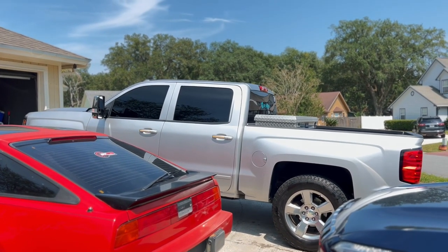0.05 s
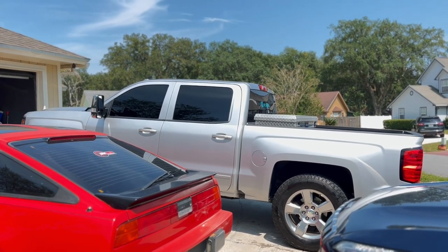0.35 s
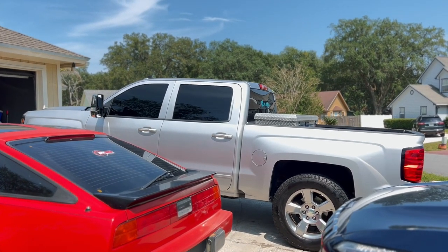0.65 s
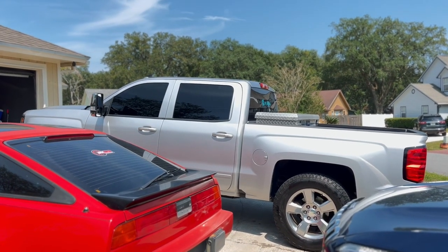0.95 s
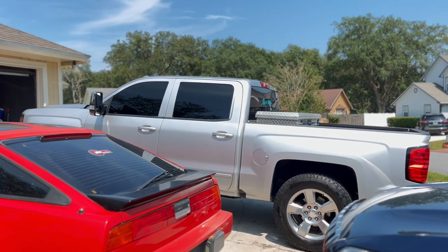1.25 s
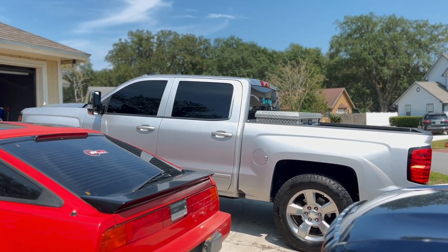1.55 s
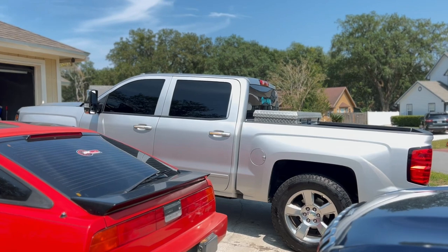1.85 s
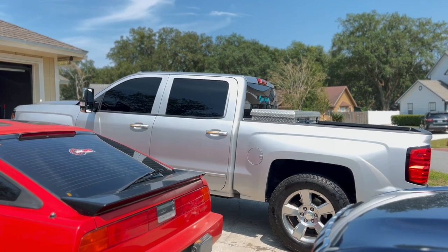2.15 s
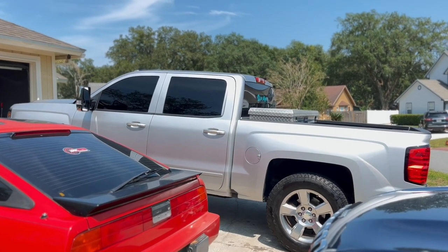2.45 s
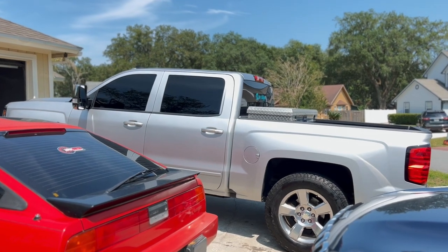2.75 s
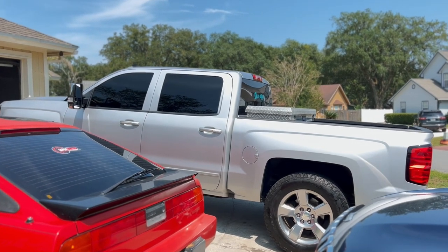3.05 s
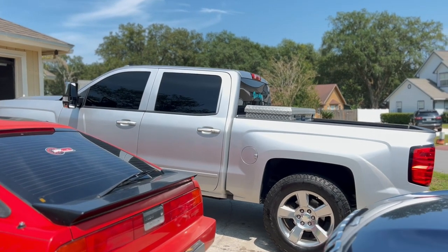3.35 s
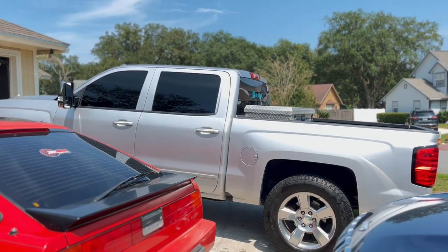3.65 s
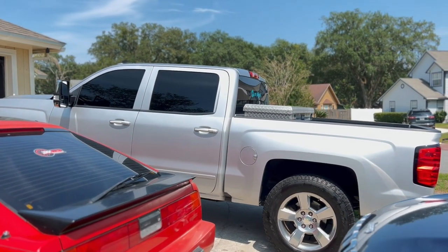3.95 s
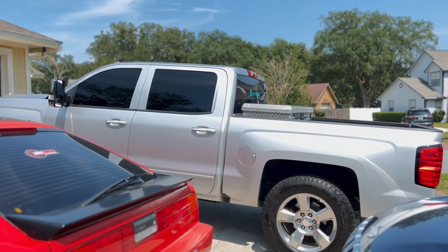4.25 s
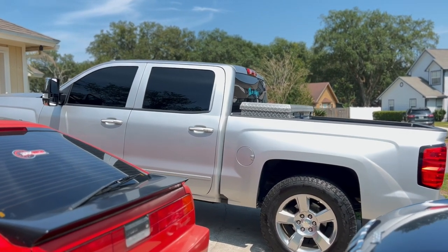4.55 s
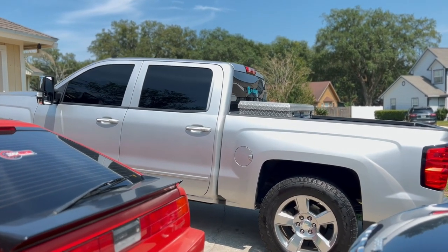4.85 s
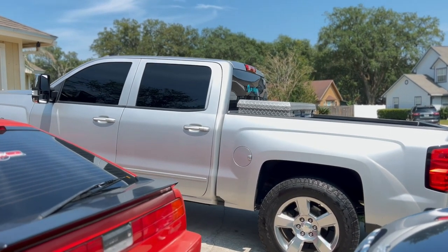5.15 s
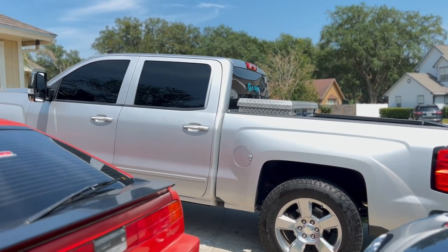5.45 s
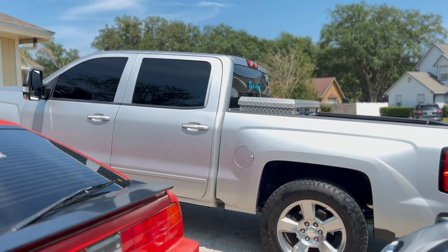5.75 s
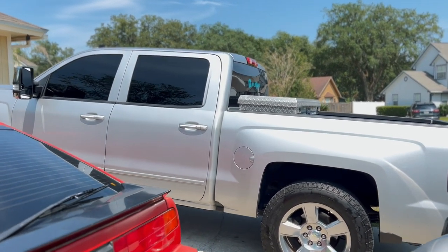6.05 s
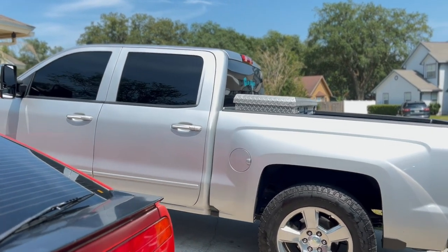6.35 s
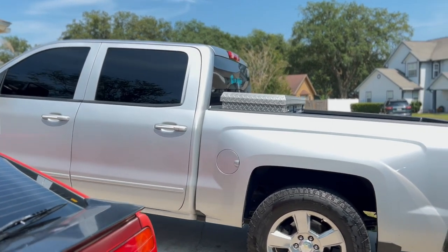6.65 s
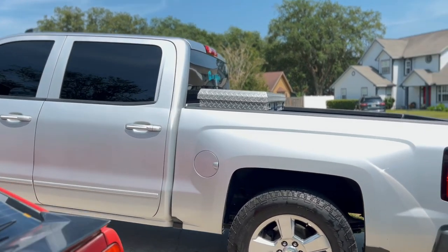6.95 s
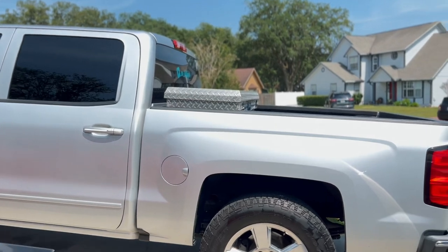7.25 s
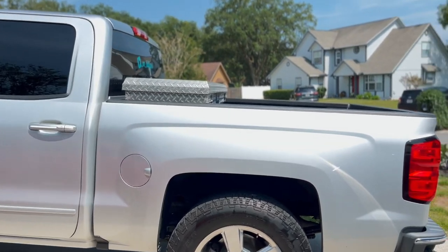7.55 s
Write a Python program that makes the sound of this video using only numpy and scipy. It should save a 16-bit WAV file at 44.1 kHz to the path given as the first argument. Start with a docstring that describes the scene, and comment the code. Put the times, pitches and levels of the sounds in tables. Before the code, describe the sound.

A low, quiet outdoor rumble opens the scene, with a few soft thumps and tiny scuffs near the microphone in the first second. At about 1.9 seconds a pickup's fuel pump starts a faint hum with a thin high whine. At 2.5 seconds the starter clacks in and cranks the cold engine in quickening, rattling pulses, with one small metallic chink. At about 3.3 seconds the V8 catches with a deep, loud whump, a cluster of sharp pops and two brief scrapes as the starter lets go. The engine races until about 4 seconds, then gradually sinks to a loud, throbbing fast idle, uneven and dotted with hollow exhaust pops. Walls and parked cars add a short echo. From 6 seconds the exhaust grows a little louder and raspier as the microphone approaches, still running at the end, around 7.6 seconds.

```python
"""A V8 pickup starts cold on a driveway. Its fuel pump hums, the starter clacks in and turns the
engine over, then the engine catches, races briefly and sinks to a fast idle. Each of the eight
cylinders pushes its own unequal puff of gas down the open exhaust pipe, so the sound throbs; fuel
that burns late adds sharp pops. House walls and parked cars give a short echo. A low outdoor rumble
lies underneath, with a few soft thumps and scuffs in the first second."""
import sys
import numpy as np
from scipy import signal
from scipy.fft import rfft, irfft, next_fast_len
from scipy.io import wavfile
from scipy.ndimage import uniform_filter1d, map_coordinates

SR = 44100
rng = np.random.default_rng(int(sys.argv[2]) if len(sys.argv) > 2 else 0)


def wrap_up_sound(samples):
    """Save the sound to the file named by the first command line argument, as 16-bit audio."""
    columns = np.atleast_2d(samples).T
    # keep every value between -1 and 1, then stretch to whole-number steps
    tamed = np.clip(columns, -1, 1)
    steps = np.round(tamed * 32767).astype(np.int16)
    wavfile.write(sys.argv[1], SR, steps)


N = 335160
T = np.arange(N) / SR

# how fast the engine runs: (time [s], firings [per s])
ENGINE_SPEED = [(3.28, 80.65), (3.55, 96.6), (3.8, 98.6), (3.95, 94.4), (4.3, 89), (4.75, 85.35),
                (5.6, 81.8), (5.95, 82.7), (6.4, 80.9), (6.7, 80.9), (7.3, 78.8), (7.6, 80.2)]
# the cylinders in the order they fire: (push [dB], lateness [gaps between firings], rasp [dB])
CYLINDERS = [(-9.5, .51, 2), (-6, .38, 2), (-5.7, .51, -1), (-12, .5, 2), (-2.8, .5, -1), (-5.4, .45, 2),
             (-6.2, .45, -3), (-2.2, .52, -2)]
# loudness of the exhaust's mid-pitched bark; the "flare" is the surge as the engine catches:
# (start [s], fade-in [s], idle level [dB], flare boost [dB], flare decay [s], close-up boost [dB])
BARK = (3.3, .02, -24.3, 8.5, .55, 3)
PUMP_START_S, CRANK_START_S, CATCH_S = 1.91, 2.545, ENGINE_SPEED[0][0]


def amp(db):
    """Turn decibels into a number to multiply by."""
    return 10 ** (np.asarray(db) / 20)


def unit(x):
    """Scale a sound to an average power of 1."""
    return x / np.sqrt(np.mean(x ** 2) + 1e-20)


def along(points, hz):
    """Read between (pitch, value) points, giving each octave about equal room."""
    pitches, values = np.transpose(points)
    return np.interp(np.log(hz + 1), np.log(pitches + 1), values)


def curve(rows):
    """Join (time, value) points with straight lines, one value per sample."""
    return np.interp(T, *np.transpose(rows))


def ramp(start, length):
    """Rise from 0 to 1; start and length are in seconds."""
    return np.clip((T - start) / length, 0, 1)


def hump(x, centre, width):
    """A bell shape that reaches 1 at its centre."""
    return np.exp(-.5 * ((x - centre) / width) ** 2)


def swell(age, rise):
    """Grow to 1 in `rise` seconds, then die away."""
    return age / rise * np.exp(1 - age / rise)


def wobble(rate):
    """A smooth curve through `rate` random values a second."""
    return map_coordinates(rng.standard_normal(4096), [T * rate], mode="wrap")


def filtered(x, response):
    """Scale and delay each pitch in x as response(hz) says."""
    size = next_fast_len(N + SR // 4)
    return irfft(rfft(x, size) * response(np.fft.rfftfreq(size, 1 / SR)), size)[..., :N]


def ring(x, colour, peaks=(), size=16384):
    """Pass x through a ringing body; colour and peaks say which pitches it favours over others."""
    hz = np.fft.rfftfreq(size, 1 / SR)
    db = along(colour, hz) + sum(lift * hump(hz, pitch, width) for pitch, width, lift in peaks)
    cepstrum = irfft(np.log(amp(db)))
    cepstrum[1:size // 2] *= 2  # folding this in half puts all the ringing after the hit
    cepstrum[size // 2 + 1:] = 0
    ringing = irfft(np.exp(rfft(cepstrum)))
    ringing /= np.linalg.norm(ringing)
    return signal.oaconvolve(x, ringing.reshape((1,) * (x.ndim - 1) + (-1,)), axes=-1)[..., :N]


def noise():
    """Even stereo hiss, nearly the same left and right in the bass."""
    # how well the two sides match: (pitch [Hz], likeness [0 to 1])
    likeness = [(60, 0.96), (125, 0.96), (250, 0.82), (500, 0.73), (1000, .85), (2000, 0.76), (4000, 0.12),
                (8000, 0.42), (12000, 0.23)]
    angle = lambda hz: np.arccos(np.clip(along(likeness, hz), -1, 1)) / 2
    shares = lambda hz: np.array([np.cos(angle(hz)), np.sin(angle(hz))])
    mid, side = filtered(rng.standard_normal((2, N)), shares)
    return np.array([mid + side, mid - side])


def impulses(times, sizes):
    """Spikes at the given moments."""
    return np.bincount(np.clip(np.round(np.asarray(times) * SR).astype(int), 0, N - 1), sizes, N)


def bursts(times, sizes, decay):
    """Loudness shapes that jump up and die away."""
    return signal.lfilter([1], [1, -np.exp(-1 / (decay * SR))], impulses(times, sizes))


def puffs(times, sizes, decay):
    """Bursts with a rounded start."""
    return 2 * (bursts(times, sizes, decay) - bursts(times, sizes, decay / 4))


def outdoors():
    """Quiet air and a low rumble that swells."""
    # how the rumble rises and falls: (time [s], relative level [dB])
    rumble_levels = [(0, -49), (.2, -55), (.7, -54), (1.1, -58), (1.5, -46), (1.76, -41), (2.4, -48),
                     (3.25, -44)]
    # tone of the rumble: (pitch [Hz], level [dB])
    rumble_colour = [(20, -28), (40, -8), (56, -6), (64, 6.5), (80, -10.5), (120, -12), (200, -24),
                     (400, -70.5)]
    # tone of the air: (pitch [Hz], level [dB])
    air_colour = [(65, -27.5), (110, -5), (132, -7.5), (155, -7), (238, -5), (263, -14.5), (297, -2.5),
                  (322, -12), (669, -21.5), (836, -22.5), (3900, -35), (5970, -33.5), (14000, -59)]
    rumble = amp(curve(rumble_levels) + 3.5) * ring(noise(), rumble_colour)
    return rumble + amp(-54) * ring(noise(), air_colour)


def bumps():
    """Soft low thumps that swell and die within a few vibrations."""
    # the thumps: (start [s], level [dB], pitch [Hz], rise [s])
    thumps = [(.008, -36, 62, .014), (.096, -39, 150, .008), (.288, -35, 70, .009), (.748, -37, 75, .01)]
    out = 0
    for start, db, hz, rise in thumps:
        age = np.maximum(T - start, 0)
        out += amp(db) * swell(age, rise) * np.sin(2 * np.pi * hz * age + .6 * wobble(90))
    return out


def scuffs():
    """A few tiny dry scuffs near the microphones."""
    # the scuffs: (time [s], relative level [dB], pitch [Hz])
    touches = [(.055, -55, 2000), (.2, -49, 1300), (.232, -54, 1900), (.292, -52, 1000), (.7, -56, 6500),
               (.726, -52, 1900), (.79, -53, 1700)]
    out = 0
    for start, db, hz in touches:
        rub = puffs([start], amp([db - 10]), decay=.012) * noise()
        out += ring(rub, [(hz / 2, -14), (hz, 0), (hz * 1.6, -14), (hz * 4, -34)])
    return out


def fuel_pump(spin_up_s=.012, creep_per_s=.06):
    """The pump spins up and creeps higher; the tank's hum builds with the pressure."""
    # the pump's notes: (pitch [Hz], relative level [dB])
    notes = [(226.1, -52), (339.1, -47.5), (565, -65), (624.5, -62), (667.5, -61), (732.1, -64),
             (1642, -68), (1755, -67), (2030, -72), (6185, -83)]
    # tone of the flowing fuel: (pitch [Hz], level [dB])
    flow_colour = [(150, -45), (250, -21), (280, -11), (335, -13), (420, -18.5), (661, -15.5), (959, -23.5),
                   (1750, -21), (2410, -32.5), (3390, -32), (4260, -40), (6380, -39), (12000, -53),
                   (15600, -71), (22000, -120)]
    # where the tank rings: (pitch [Hz], width [Hz], boost [dB])
    tank_peaks = [(700, 70, 3), (6500, 300, 5)]
    speed = 1 - .2 * np.exp(-np.maximum(T - PUMP_START_S, 0) / spin_up_s)
    speed += creep_per_s * (np.clip(T, 2.12, 2.6) - 2.3) + .001 * wobble(16)
    clock = np.cumsum(speed) / SR
    hum = 0
    for hz, db in notes:
        fade_in = ramp(2.07, .14) if hz < 500 else ramp(PUMP_START_S, .06)
        hum += amp(db + 4 + 1.2 * wobble(12)) * fade_in * np.sin(2 * np.pi * hz * clock)
    flow = amp(-54.3 + 4 * ramp(PUMP_START_S, .3)) * ring(noise(), flow_colour, tank_peaks)
    return (hum + flow * ramp(PUMP_START_S, .024)) * (1 - ramp(2.54, .091))


def pump_whine():
    """The pump's thin high note sags under load, then creeps up and softens as the fuel line fills."""
    # path of the note: (time [s], pitch [Hz])
    pitch_path = [(1.96, 3400), (1.985, 3510), (2.05, 3425), (2.13, 3432), (2.41, 3494), (2.45, 3528)]
    phase = 2 * np.pi * np.cumsum(curve(pitch_path) * (1 + .001 * wobble(40))) / SR
    db = -63 - 5 * ramp(2.4, .03) + wobble(14)
    return amp(db) * np.sin(phase) * ramp(pitch_path[0][0], .01) * (1 - ramp(CRANK_START_S, .05))


def starter(dip_db=4.5):
    """Gear teeth rattle the case; each squeeze of air in a cylinder slows and quietens the motor."""
    # when the engine squeezes hardest: (time [s])
    squeezes = [2.69, 2.905, 3.05, 3.168, 3.25]
    # how fast the gear teeth meet: (time [s], pitch [Hz])
    tooth_pitch = [(2.545, 300), (2.6, 650), (2.66, 930), (2.71, 1060), (2.765, 1100), (2.81, 1030),
                   (2.87, 900), (2.91, 900), (2.945, 1250), (2.98, 1170), (3.04, 1050), (3.09, 1260),
                   (3.16, 1150), (3.21, 1350)]
    # tone of the starter's case: (pitch [Hz], level [dB])
    case_colour = [(110, -22), (180, -2), (297, 1), (351, -7.5), (457, -2.5), (703, -5.5), (831, -6.5),
                   (904, -13), (1240, -1), (1370, -6), (5000, -23.5), (6500, -38), (11000, -120)]
    # where the case rings: (pitch [Hz], width [Hz], boost [dB])
    case_peaks = [(1260, 40, 1), (850, 23, 3.2), (2080, 100, 2), (2430, 60, 2)]
    # tone of the gears' hiss: (pitch [Hz], level [dB])
    hiss_colour = [(1760, -19), (3000, 0.5), (5500, 1), (8000, -4), (12000, -11), (16000, -23.5)]
    # the small drive gear clacks in, then knocks after squeezes: (time [s], relative level [dB])
    clacks = [(2.547, -23), (2.574, -17), (2.931, -23), (3.069, -23), (3.187, -22)]
    # the starter's nose rings at each knock: (pitch [Hz], relative level [dB], decay [s])
    nose_notes = [(620, -21, .02), (1245, -20, .018), (2450, -27, .018)]
    load = sum(hump(T, moment, width=.02) for moment in squeezes)
    phase = 2 * np.pi * np.cumsum(curve(tooth_pitch) * (1 + .04 * wobble(220))) / SR
    whine = amp(-43 + 4 * wobble(70)) * (np.sin(phase) + np.sin(2 * phase)) * ramp(2.58, .2)
    whine *= amp(-2 * dip_db * load) * (1 - .5 * ramp(2.98, .1))
    rattle = unit(amp(3 * wobble(220)) * (1 + .13 * np.sin(phase)) * noise())
    gears = amp(-38) * ring(rattle, case_colour, case_peaks) + whine
    hiss = amp(-45) * ring(amp(1.4 * wobble(200)) * noise(), hiss_colour)
    # the turning engine pumps air out of the pipe
    chuff = amp(-46 + 7 * load) * ring(noise(), [(45, -25), (80, 0), (110, -3), (200, -25), (600, -60)])
    running = ramp(CRANK_START_S, .038) * (1 - ramp(CATCH_S, .2))
    cranking = ((gears + hiss) * amp(-dip_db * load) + chuff) * running
    times, db = np.transpose(clacks)
    hits = puffs(times, amp(db - 12), decay=.02) * noise()
    knocks = ring(hits, case_colour, case_peaks) + .5 * ring(hits, hiss_colour)
    clang = sum(puffs(times, amp(db + level), decay) * np.sin(2 * np.pi * hz * T + 1.1 * wobble(130))
                for hz, level, decay in nose_notes)
    return cranking + knocks + clang


def chink(start_s=2.675):
    """A small steel part chinks once as the engine begins to turn."""
    # the part's notes: (pitch [Hz], level [dB])
    notes = [(4950, -51), (5280, -50), (6100, -45)]
    strike = puffs([start_s], [1], decay=.02)
    return strike * sum(amp(db) * np.sin(2 * np.pi * hz * T + wobble(150)) for hz, db in notes)


def firing_count():
    """How many firings have gone by since the engine caught."""
    return np.cumsum(curve(ENGINE_SPEED) * (T >= CATCH_S)) / SR


def once_a_cycle(place):
    """The times at which the engine passes one place in its cycle of eight firings."""
    count = firing_count()
    return np.interp(np.arange(place, count[-1], len(CYLINDERS)), count, T)


def flare(t, decay, hold_until_s=3.47):
    """Stays at 1 while the engine catches, then dies away."""
    return np.exp(-np.maximum(t - hold_until_s, 0) / decay)


def firings():
    """Time, push and rasp of every firing; a cold engine burns unevenly at first."""
    count = firing_count()
    index = np.arange(int(count[-1]))
    push_db, late, rasp_db = np.array(CYLINDERS)[index % len(CYLINDERS)].T
    time_luck, push_luck, rasp_luck = rng.standard_normal((512, 3))[index].T
    uneven_db = .7 + 2.3 * flare(np.interp(index, count, T), decay=.45)
    times = np.interp(index + late + .012 * uneven_db * time_luck, count, T)
    return times, amp(push_db + uneven_db * push_luck), amp(rasp_db + 1.8 * rasp_luck)


def voiced(x, voice):
    """Even out one exhaust sound, keeping its throb; it then flares, sinks and grows as we near."""
    start, fade_in, idle_db, flare_db, decay, near_db = voice
    smooth = lambda v: np.abs(uniform_filter1d(uniform_filter1d(v, SR // 10), SR // 10))
    power = smooth(np.atleast_2d(x ** 2).mean(0))
    even = x * np.sqrt(smooth(1. * (T > CATCH_S)) / (power + 1e-12))
    nearness = ramp(6, 1.6)  # the microphone moves toward the tailpipe
    return even * ramp(start, fade_in) * amp(idle_db + flare_db * flare(T, decay) + near_db * nearness)


def pipe_bounce(hz, pipe_hz=136.2, kept=.3):
    """Sound bounces up and down the pipe, keeping a share of its strength on each round trip."""
    return np.sqrt(1 - kept ** 2) / (1 - kept * np.exp(-2j * np.pi * hz / pipe_hz))


def pipe_linger(hz):
    """The pipe's deep ringing stores each pulse and gives it back late, smoothing the throb."""
    # the ringing that stores the pulses: (pitch [Hz], width [Hz])
    storing = [(162, 10)]
    return np.prod([(f * f - hz * hz - 1j * hz * width) / (f * f - hz * hz + 1j * hz * width)
                    for f, width in storing], axis=0)


def between_cars(x, longest_s=.011, spots=5):
    """Between the cars each pitch takes its own detour; the paths change as the microphone moves."""
    place = ramp(CATCH_S, T[-1] - CATCH_S) * (spots - 1)
    pitches = np.arange(240, 2000, 110)
    out = 0
    for spot in range(spots):
        detours = longest_s * rng.random(len(pitches))
        path = lambda hz: np.exp(-2j * np.pi * np.cumsum(np.interp(hz, pitches, detours, left=0)) * hz[1])
        out += np.cos(np.pi / 2 * np.clip(place - spot, -1, 1)) * filtered(x, path)
    return out


def exhaust(wall_echo_s=.021):
    """Each firing sends a pressure pulse and a puff of swirling gas down the pipe."""
    # tone of the pipe at high idle: (pitch [Hz], level [dB])
    fast_colour = [(20, -58), (38, -21), (52, -20), (85, 16.5), (130, 7), (175, 7), (230, 1), (290, -4),
                   (420, -8), (560, -11), (800, -27), (1400, -32), (4000, -92)]
    # tone of the pipe at settled idle: (pitch [Hz], level [dB])
    settled_colour = [(20, -73), (38, -81), (52, 35.5), (85, 5.5), (130, 6), (165, 10.5), (230, 1),
                      (290, 1), (420, -6.5), (560, -5.5), (800, -14), (1400, -18), (4000, -75.5)]
    # narrow peaks and dips of the pipe: (pitch [Hz], width [Hz], boost [dB])
    peaks = [(367.4, 18, -4), (403, 13, 2.5), (505, 16, 2.5), (690, 18, 3), (1206, 60, 2.5), (1370, 71, 3),
             (1600, 115, -7.5), (1860, 80, 6.5), (2130, 110, 4.5), (2650, 100, 2.5), (3100, 200, -2.5),
             (3570, 130, 6)]
    # tone of the rasping gas: (pitch [Hz], level [dB])
    rasp_colour = [(100, -38), (300, 6), (600, 12.5), (900, 10), (1300, 5.5), (2000, -3.2), (2600, -9.2),
                   (3400, -17), (5000, -35), (9000, -39), (16000, -57)]
    # tone of the hissing gas: (pitch [Hz], level [dB])
    hiss_colour = [(1500, -20), (3500, 11), (5000, 7), (7000, 1), (9000, 0.5), (12000, -11.5), (16000, -9)]
    # loudness of the boom, the rasp and the hiss:
    # (start [s], fade-in [s], idle level [dB], flare boost [dB], flare decay [s], close-up boost [dB])
    boom_voice = (3.28, .02, -14.8, 3, .25, .5)
    rasp_voice = (3.293, .022, -36.5, 18, .45, 5.3)
    hiss_voice = (3.21, .12, -57.3, 21.3, .28, 6.5)
    times, push, rush = firings()
    swirl = .004 * bursts(times, push, decay=.005) * rng.standard_normal(N)  # roughens each pulse's tail
    pulses = impulses(times, push) + swirl
    settled = .15 + .75 * ramp(4.3, 2.1)
    tone = (1 - settled) * ring(pulses, fast_colour, peaks)
    tone += settled * ring(pulses, settled_colour, peaks)
    # above the bark's pitch the pulse breaks up into gas noise
    tone = filtered(tone, lambda hz: pipe_bounce(hz) / (1 + (hz / 900) ** 6))
    boom = filtered(tone, lambda hz: 1 / (1 + (hz / 200) ** 8))
    # the garage wall throws the bark back
    bark = filtered(tone - boom, lambda hz: 1 + .3 * np.exp(-2j * np.pi * hz * wall_echo_s))
    boom = voiced(filtered(boom, pipe_linger), boom_voice)
    bark = voiced(between_cars(bark), BARK)
    throb = pipe_drone(boom + bark + chugs())
    gas_times = times - .002  # gas rushes out ahead of the pressure peak
    gas = filtered((puffs(gas_times, rush, decay=.003) + .4) * noise(), pipe_bounce)
    rasp = ring(gas, rasp_colour, peaks)
    hiss = (puffs(gas_times, rush, decay=.006) + 2.2) * ring(noise(), hiss_colour)
    return throb + voiced(rasp, rasp_voice) + voiced(hiss, hiss_voice)


def first_blast(start_s=3.287, hz=58, level_db=-13):
    """The first firings shove the still air out of the pipe in one deep whump."""
    age = np.maximum(T - start_s, 0)
    return -amp(level_db) * swell(age, rise=.035) * np.sin(2 * np.pi * hz * age)


def pops(churn_s=.012):
    """Fuel that burns late cracks in the pipe: bright while the engine flares, hollow at idle."""
    # the loudest pops: (time [s], relative level [dB], decay [s])
    loud_pops = [(3.3138, -13, .003), (3.3417, -10, .0022), (3.3702, -12, .004), (3.3894, -10, .003),
                 (3.4111, -11, .003), (3.4245, -3, .003), (3.4585, -7, .004), (3.5194, -14, .003),
                 (3.6017, -17, .0022), (3.929, -21, .002), (4.015, -18, .003), (4.0934, -22, .002),
                 (4.1274, -19, .005), (4.271, -24, .002), (4.304, -21, .003), (4.452, -25, .002),
                 (4.509, -22, .004), (4.589, -24, .002), (4.696, -22, .003), (4.87, -22, .002),
                 (4.9656, -16, .003), (5.5415, -21, .0025), (5.638, -19, .006), (5.833, -23, .0025),
                 (6.0275, -17, .0025), (6.222, -20, .002), (6.616, -25, .002), (6.814, -23, .002),
                 (6.954, -22, .003), (7.016, -14, .002), (7.066, -23, .002), (7.154, -22, .003),
                 (7.205, -22, .002), (7.256, -21, .003), (7.3183, -20, .003), (7.47, -22, .002),
                 (7.5198, -18, .003), (7.558, -22, .003)]
    # tone of the pops as the engine catches: (pitch [Hz], level [dB])
    bright_colour = [(150, -15), (500, -3), (1200, -1), (1600, 0), (2000, 7), (2700, -2), (3500, -9),
                     (5000, -19), (9000, -27), (16000, -38)]
    # tone of the pops at idle: (pitch [Hz], level [dB])
    hollow_colour = [(150, -20), (500, -4.5), (850, -.5), (1250, 3), (1600, -13), (2150, -10),
                     (2700, -17.5), (3300, -25), (5000, -37), (9000, -45), (16000, -55)]
    crack = spits() + sum(puffs([start], amp([db]), decay) for start, db, decay in loud_pops)
    churn = signal.lfilter([1 / (churn_s * SR)], [1, -np.exp(-1 / (churn_s * SR))], crack)  # soft tail
    gas = (amp(-7) * crack + amp(-10) * churn) * noise()
    idling = ramp(3.52, .3)
    return idling * ring(gas, hollow_colour) + amp(-2) * (1 - idling) * ring(gas, bright_colour)


def starter_release():
    """The starter's small gear slides out of the engine's big one with two bright scrapes."""
    # the scrapes: (time [s], level [dB])
    scrapes = [(3.424, -29), (3.459, -32)]
    times, db = np.transpose(scrapes)
    grit = ring(noise(), [(2000, -20), (5000, -2), (8000, 0), (12000, -2), (16000, -10)])
    return bursts(times, amp(db), decay=.02) * grit


def pipe_drone(x, step=16):
    """The engine's overtones swell and fade as its speed slides them past pitches where the pipe rings."""
    # the overtones that drone:
    # (multiple of the cycle rate, pipe pitch [Hz], width [Hz], base level [dB], boost [dB])
    overtones = [(5, 49.5, 1.2, -32.4, 8.4), (6, 73.0, 2.8, -40.8, 15.7), (7, 72.9, 1.7, -35.7, 9.3),
                 (8, 85.7, 2.2, -20.2, 5.5), (9, 103.7, 1.8, -32.8, 7.1), (10, 98.5, 1.1, -33.7, 6.3),
                 (11, 131.2, 7.2, -31.5, 9.7), (13, 132.7, 3.0, -31.9, 11.4), (14, 138.6, 1.8, -35.9, 9.3),
                 (16, 159.6, 3.5, -28.0, 9.5), (17, 168, 1.7, -40, 9), (18, 177, 2.7, -36, 10),
                 (21, 210.8, 3.8, -35.2, 7.0), (24, 244.5, 3.0, -35.8, 4.8), (26, 263, 13, -44, 13),
                 (27, 284.5, 11.7, -41.4, 9.5), (30, 304, 4.5, -42, 10), (31, 338, 3.1, -40, 6),
                 (32, 336.3, 7.8, -42.8, 14.6), (37, 410, 12, -53, 17), (39, 420, 13, -48, 9),
                 (40, 392, 21, -45.8, 15), (41, 405, 4.1, -42, 8), (42, 413, 4.2, -46, 10),
                 (43, 432, 4.3, -43, 9), (46, 471, 4.6, -48, 9), (48, 503, 16, -52, 13),
                 (51, 510, 7.6, -45, 8), (53, 539.4, 6.7, -48, 15), (55, 577, 5.5, -49, 10),
                 (56, 574, 18, -54, 12), (65, 651, 10, -56, 12), (67, 668, 8, -55, 15),
                 (69, 682, 8, -57, 15), (70, 689, 6, -57, 18), (80, 814, 8, -55, 9)]
    cycle_phase = 2 * np.pi * firing_count()[::step] / len(CYLINDERS)
    cycle_hz = curve(ENGINE_SPEED)[::step] / len(CYLINDERS)
    window = SR // 10 // step
    smooth = lambda v: uniform_filter1d(uniform_filter1d(v, window), window)
    flare_db, flare_decay = BARK[3:5]
    change = 0
    for multiple, hz, width, db, boost_db in overtones:
        turn = np.exp(1j * multiple * cycle_phase)
        overtone = 2 * smooth(x[::step] / turn) * turn  # pick this one overtone out of x
        wanted = np.sqrt(2) * amp(db + boost_db * hump(multiple * cycle_hz, hz, width))
        if hz > 200:  # the upper overtones flare with the bark
            wanted *= amp(.8 * flare_db * flare(T[::step], flare_decay))
        change += overtone.real * (wanted / (np.abs(overtone) + 1e-4) - 1)
    return x + signal.resample_poly(change, step, 1)[:N] * ramp(3.5, .2)


def chugs(scatter_db=1.8, detune=.016):
    """Some cylinders strike a short hollow note from the pipe once a cycle, making the idle limp."""
    # the notes, each of which comes and goes:
    # (place in the cycle [firings], strongest at [s], span [s], pitch [Hz], level [dB])
    pipe_notes = [(5, 4.15, .2, 1320, -29), (1, 4.3, .25, 520, -22), (1.1, 4.78, .2, 710, -20),
                  (1.2, 4.7, .25, 900, -27), (7.3, 4.8, .5, 420, -24), (.5, 5.3, .7, 300, -19),
                  (1.2, 5.4, .3, 620, -25.5), (3.5, 5.9, .5, 300, -18), (5.3, 6, .45, 550, -25),
                  (6.4, 5.95, .5, 560, -23), (1.3, 6.5, .6, 540, -24), (3.3, 7.1, .5, 410, -17.5),
                  (4.35, 7.15, .4, 710, -27)]
    age = np.arange(SR // 25) / SR
    out = np.zeros(N)
    for place, strongest, span, hz, db in pipe_notes:
        times = once_a_cycle(place)[:, None]
        luck = rng.standard_normal((64, 2))[:len(times)]
        sizes = amp(db + scatter_db * luck[:, :1]) * hump(times, strongest, span)
        pitches = hz * (1 + detune * luck[:, 1:])
        notes = sizes * swell(age, rise=.004) * np.sin(2 * np.pi * pitches * age)
        moments = times + age
        out += impulses(moments.ravel(), (notes * (moments < T[-1])).ravel())
    return out * (1 + .14 * wobble(900))


def spits(scatter_db=1.5):
    """Loudness shape of the few cylinders that pop on every idle cycle, never equally hard."""
    # the popping cylinders: (place in the cycle [firings], start [s], relative level [dB])
    spitters = [(.33, 4.9, -23.5), (1.4, 4.2, -30), (5.25, 4.6, -30), (3.3, 5.5, -33)]
    out = 0
    for place, start, db in spitters:
        times = once_a_cycle(place)
        sizes = amp(db + scatter_db * rng.standard_normal(len(times)))
        out += puffs(times, sizes * (times > start), decay=.0025)
    return out


def yard_echo(x):
    """Walls and car bodies scatter a short echo, different at each ear and weak in the bass."""
    # how long the echo lasts: (pitch [Hz], time to fade by 60 dB [s])
    fade_times = [(100, 0.31), (500, 0.36), (2000, 0.66), (10000, 0.033)]
    colour = [(80, -29), (200, -21), (400, -15), (700, -12), (2000, -13), (8000, -14)]
    pitches, t, spectrum = signal.stft(rng.standard_normal((2, SR // 3)), SR, nperseg=256)
    fade = amp(-60 * t / along(fade_times, pitches)[:, None])
    tail = signal.istft(spectrum * fade, SR, nperseg=256)[1]
    echo = signal.oaconvolve(x, tail / np.linalg.norm(tail[0]), axes=1)[:, :N]
    return filtered(echo, lambda hz: amp(along(colour, hz)))


def scene():
    """The truck and its echo in the open air."""
    engine = exhaust() + pops() + first_blast()
    truck = engine + fuel_pump() + pump_whine() + starter() + chink() + starter_release()
    return truck + yard_echo(truck) + outdoors() + bumps() + scuffs()


def record(dry, ceiling=.98, top_hz=15800):
    """Two spaced, slightly unlike microphones round off loud peaks and lose the highest treble."""
    # how the microphones differ: (pitch [Hz], left minus right [dB])
    balance = [(60, -.6), (250, -.7), (700, -3), (1400, -1.7), (2800, .5), (5500, 3.5), (10000, 0)]
    # bass reaches the left one later: (pitch [Hz], lag [radians])
    lag = [(30, .1), (85, .17), (200, .17), (600, 0)]
    gains = lambda hz: amp(np.outer([.5, -.5], along(balance, hz)))
    delays = lambda hz: np.exp(1j * np.outer([-.5, .5], along(lag, hz)))
    pair = filtered(dry, lambda hz: gains(hz) * delays(hz))
    rounded = pair / (1 + np.abs(pair / ceiling) ** 8) ** (1 / 8)
    return filtered(rounded, lambda hz: hz < top_hz)


dry = scene()
out = record(dry)
wrap_up_sound(out)
```